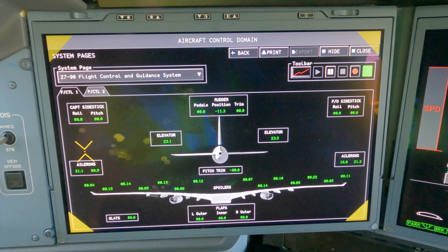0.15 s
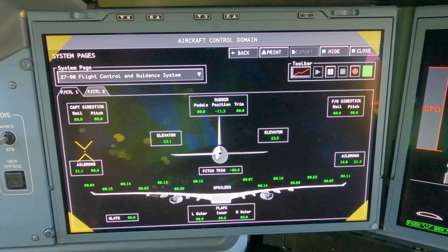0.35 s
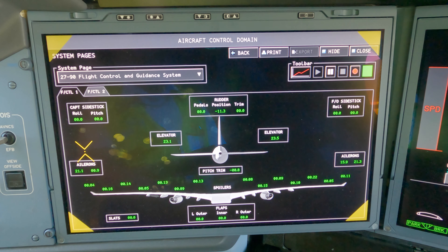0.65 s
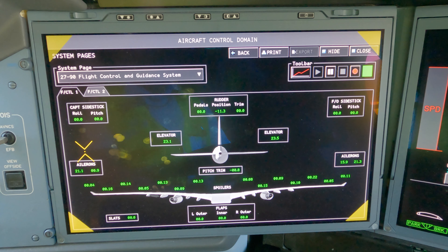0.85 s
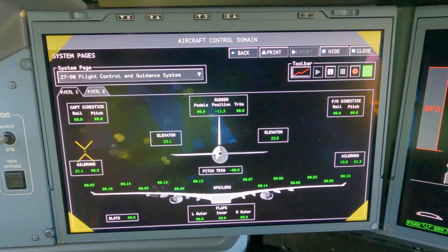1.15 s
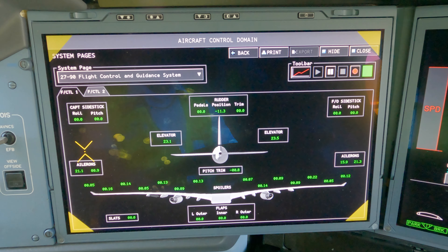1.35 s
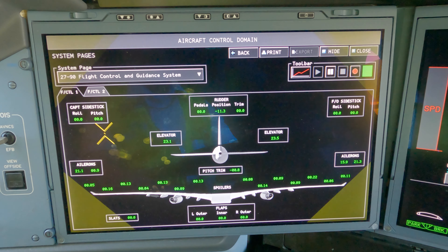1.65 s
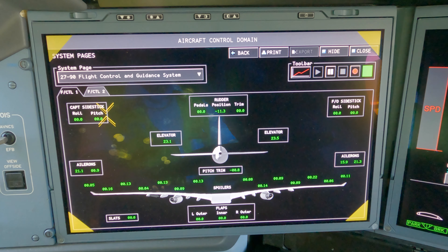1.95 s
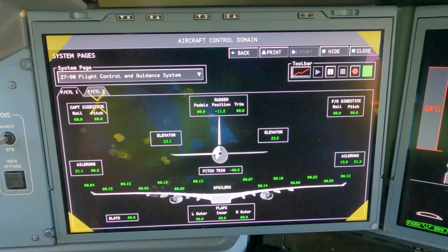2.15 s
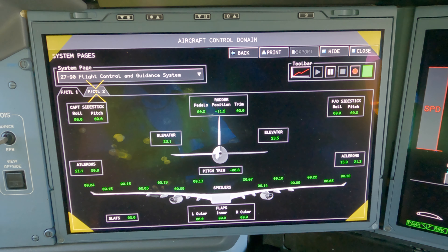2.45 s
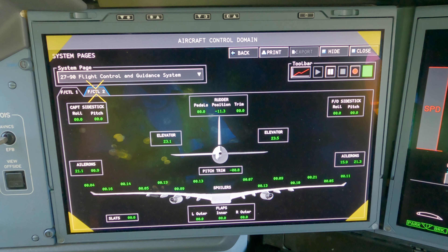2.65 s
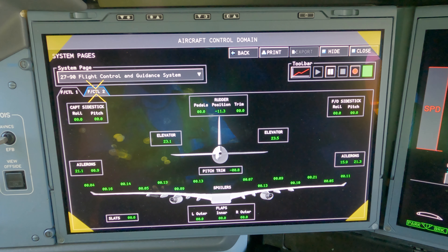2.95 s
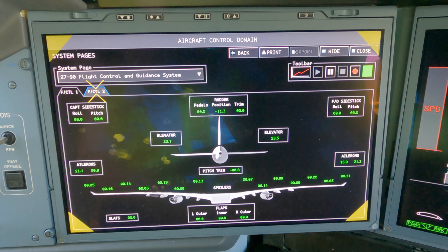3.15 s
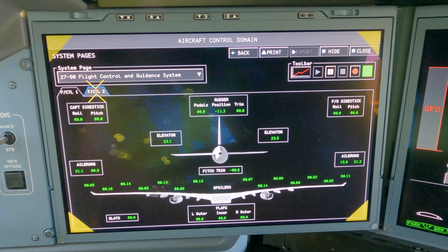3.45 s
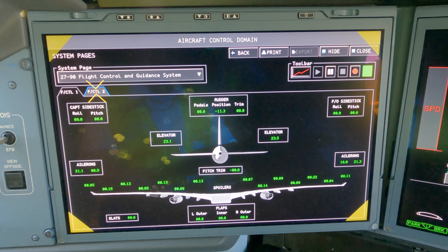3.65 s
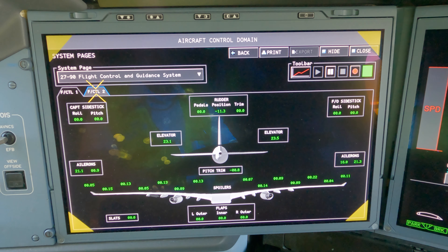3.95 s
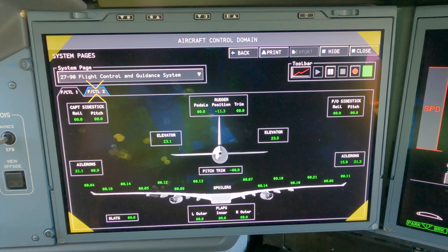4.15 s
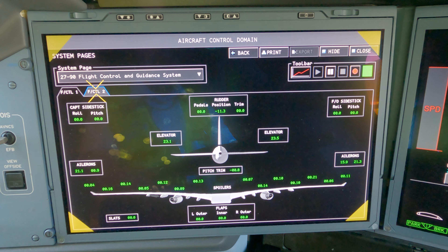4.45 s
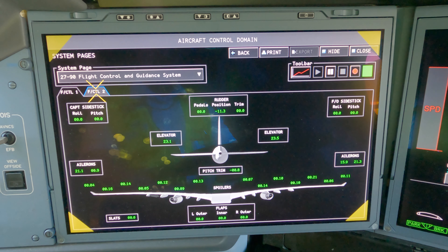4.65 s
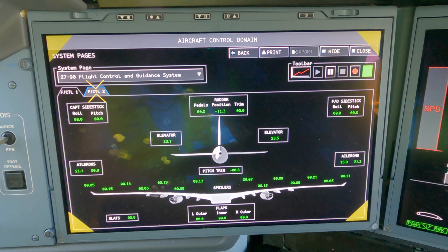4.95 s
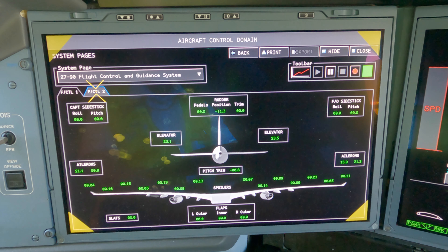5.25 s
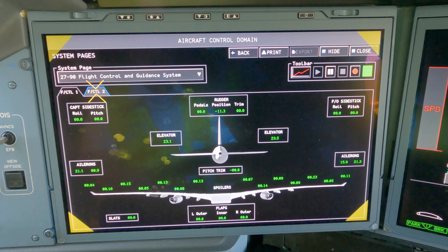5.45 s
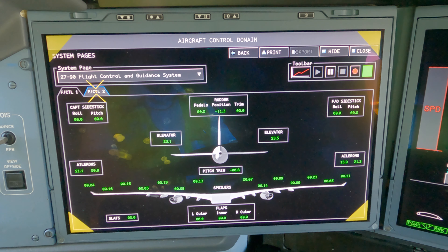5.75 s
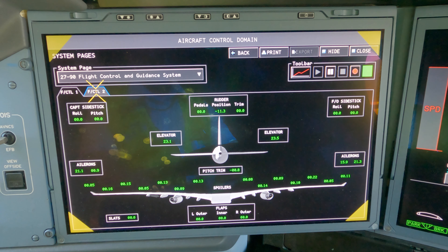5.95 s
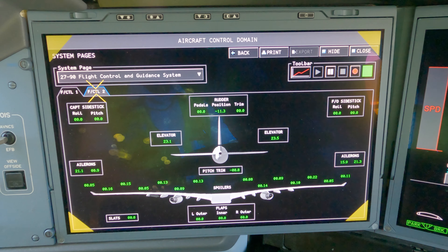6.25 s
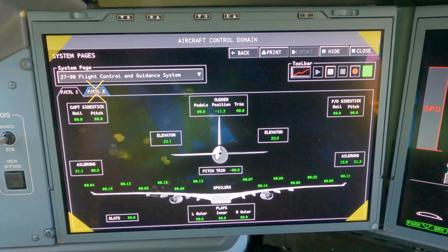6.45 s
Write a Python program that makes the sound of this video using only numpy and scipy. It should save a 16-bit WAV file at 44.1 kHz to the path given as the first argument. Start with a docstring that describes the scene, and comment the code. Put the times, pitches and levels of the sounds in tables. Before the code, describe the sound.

Cooling air rushes steadily through an aircraft cockpit, heard in stereo from inside, with a low airframe rumble and humming, thinly whining fans. One faint plastic tick opens it. Later there is a soft, brief cloth rustle, and the high whines give way to a slightly higher one. A mid-pitched fan tone swells briefly near the end while the drone carries on.

```python
"""A flight deck on the ground, heard through a two-port microphone. Cooling air rushes from the vents
and echoes off a near panel; cabin reflections cut narrow hollows in it. The airframe rumbles, fans and
ducts hum and whine. A small plastic tick comes at the start, a brief rustle later. Near 4.2 s three
whines fade, a higher one comes up and the air brightens slightly."""
import sys
import numpy as np
from scipy import signal
from scipy.fft import rfft, irfft, next_fast_len
from scipy.io import wavfile
from scipy.ndimage import uniform_filter1d

SR = 44100
rng = np.random.default_rng(int(sys.argv[2]) if len(sys.argv) > 2 else 0)


def pcm_store(signal):
    """Save signal as 16-bit PCM."""
    levels = np.round(np.clip(np.atleast_2d(signal), -1, 1) * 32767)
    wavfile.write(sys.argv[1], SR, levels.astype(np.int16).T)


N = 291501
N_FFT = next_fast_len(N)
TIME_S = np.arange(N) / SR
HZ = np.maximum(np.fft.rfftfreq(N_FFT, 1 / SR), 1)


def undb(db):
    """Decibels to gain."""
    return 10 ** (np.asarray(db) / 20)


def along(table, column=1):
    """Table column interpolated over log frequency."""
    rows = np.array(table, float)
    return np.interp(np.log(HZ), np.log(rows[:, 0]), rows[:, column])


def white():
    """Noise spectrum, unit power per Hz."""
    return rfft(rng.standard_normal(N_FFT)) * np.sqrt(SR / 2)


def wave(spectra):
    """Spectrum to sound."""
    return irfft(spectra, N_FFT)[..., :N]


def delay(ms):
    """Response of a pure delay."""
    return np.exp(-2j * np.pi * HZ * ms / 1000)


def walk(rate_hz):
    """Random steps, smoothed twice; unit deviation."""
    hold = int(SR / rate_hz)
    steps = np.repeat(rng.standard_normal(N // hold + 1), hold)
    smooth = uniform_filter1d(uniform_filter1d(steps, hold), hold)[:N]
    return smooth / smooth.std()


def pan(pan_db):
    """Port gains; pan is left minus right."""
    return undb(np.array([pan_db, -pan_db]) / 2)


def shift(centre_s=4.17, length_s=.6):
    """Smooth 0-to-1 step for the whines and the air's treble."""
    return .5 + .5 * np.tanh(2 * (TIME_S - centre_s) / length_s)


def flutter(spectra, edges_hz, rate_hz, depth_db):
    """Spectrum to sound, each band wavering alone."""
    bands = (wave(spectra * ((HZ >= lo) & (HZ < hi))) for lo, hi in zip(edges_hz, edges_hz[1:]))
    return sum(band * undb(depth_db * walk(rate_hz)) for band in bands)


def tone(hz, width_hz, db, pan_db, clean, waver_db=.8):
    """Wandering sine (power share `clean`) plus air ringing in a narrow resonance."""
    pitch_hz = hz + width_hz / 4 * walk(rate_hz=15)
    sine = np.sqrt(2) * np.sin(2 * np.pi * np.cumsum(pitch_hz) / SR)
    ring = wave(white() / (1 + (2 * (HZ - hz) / width_hz) ** 2))
    blend = np.sqrt(clean) * sine + np.sqrt(1 - clean) * ring / ring.std()
    return np.outer(pan(pan_db), undb(db + waver_db * walk(rate_hz=8)) * blend)


# Airframe spectrum: f/Hz, density/dB
RUMBLE = [(8, -86.5), (15, -55), (22, -40), (35, -47.5), (55, -45), (80, -51), (100, -57.5), (110, -62.5),
          (122, -74), (135, -81.5), (200, -110)]

def airframe_rumble():
    """Deep noise, alike at both ports."""
    return wave(white() * undb(along(RUMBLE)) * (HZ < RUMBLE[-1][0]))


# Tick onset: t/s, gain/dB
TICKS = [(.0942, -65)]
# Plastic modes: f/Hz, level/dB
TICK_MODES = [(6800, -2), (8900, -7), (10200, 2), (11300, -7), (12200, -4)]

def plastic_tick(rise_s=.00058, t60_s=.012):
    """Small plastic part ringing for a few ms."""
    age_s = TIME_S[:int(.04 * SR)]
    modes = sum(undb(db) * np.sin(2 * np.pi * hz * age_s) for hz, db in TICK_MODES)
    envelope = np.minimum(age_s / rise_s, 1) * np.exp(-np.log(1000) * age_s / t60_s)
    out = np.zeros(N)
    for start_s, db in TICKS:
        at = int(start_s * SR)
        out[at:at + len(age_s)] += undb(db) * modes * envelope
    return out


# Rustle swells: t/s, length/s, level/dB
RUSTLES = [(4.18, .085, -67.5), (4.34, .07, -75), (4.2, .5, -78), (3.45, 2.1, -76)]
# Rustle spectrum: f/Hz, relative density/dB
RUSTLE_SPECTRUM = [(2500, -8), (5000, 0), (7500, 0), (10000, -11), (12700, -15), (13200, -21), (15000, -22),
                   (15500, -45)]

def rustle(shared_gain=1.2):
    """Cloth near the microphone: overlapping swells of bright noise."""
    ports = shared_gain * white() + np.array([white(), white()])
    cloth = wave(ports * undb(along(RUSTLE_SPECTRUM)) * (HZ > 1500))
    swell = np.zeros(N)
    for start_s, length_s, db in RUSTLES:
        progress = np.clip((TIME_S - start_s) / length_s, 0, 1)
        swell += undb(db) * np.sqrt(np.sin(np.pi * progress).clip(0))
    return swell * cloth / cloth.std()


# Fan and duct pitches: f/Hz
TONE_HZ = (93.2, 243, 269, 297, 594, 759, 789, 799.5, 900, 982, 1108, 1303, 1599, 2122, 3731, 4781, 6385,
           3122, 3462, 3895, 4220, 5062, 5519, 6072)
# Per pitch: width/Hz, level/dB, pan/dB, clean share
TONES = [(2.9, -34, 0.75, 1), (19.74, -57.5, -1.5, 0), (25.7, -55.5, -2, 0.18), (35.87, -55.5, -0.5, 0.05),
         (14.96, -57, 8.5, 0.32), (26.3, -55, -1, 0.05), (14.2, -59, -1, 0.15), (2.12, -59.5, 0, 1),
         (40, -67.5, -1.5, .05), (29.5, -63, 5, 0.2), (28.7, -69, -3.5, 0), (24.8, -65, -11.5, 0.3),
         (30.4, -71.5, 2.5, 0.2), (24.4, -70, 2.5, .1), (50.1, -70.5, -6, .05), (14, -78.5, -2, 0.04),
         (60, -84, -3.5, .05), (30.3, -75, -2, .1), (35, -75, 0.5, .05), (30, -77.5, -4.5, .1),
         (30, -77.5, 0, .05), (30, -83, 1, 0.2), (40, -83, 0, .05), (30, -85, 1, .05)]
# Whine pitches: f/Hz
WHINE_HZ = (2590, 2637, 2685, 2925)
# Per whine: width/Hz, level before shift/dB, level after/dB, pan/dB, clean share
WHINES = [(29.5, -65, -77.5, 2, .1), (26, -66.5, -75, 0, .1), (50.2, -66.5, -75.5, 0, .05),
          (39.9, -86.5, -68.5, -7, 0.1)]
# Surges: t/s, fading whines' gain/dB, electrical hum line's gain/dB
SURGES = [(0, -4.5, 5.5), (.6, -2, -1), (1.1, 2, 0.5), (1.4, -5.5, -1.5), (2.2, -1, 0.5), (2.55, 2, -1),
          (3.6, -2.5, 1.5), (4, 3, -1), (4.6, 1, 1), (5.2, 6, 0), (5.5, 3, 10.5), (6.1, 6, 1.5),
          (6.6, 5, -4)]

def fans_and_ducts(hum_hz=799.5, whistle_s=4.9, whistle_half_width_s=.042):
    """Hums, a surging electrical hum line, one brief whistle, and whines that trade places at the shift."""
    times_s, *gains_db = np.array(SURGES).T
    whine_db, hum_db = (np.interp(TIME_S, times_s, db) for db in gains_db)
    hums = sum(tone(hz, *row) * undb(hum_db * (hz == hum_hz)) for hz, row in zip(TONE_HZ, TONES))
    whistle = tone(hz=4781, width_hz=5.6, db=-68, pan_db=-7, clean=.7)
    whistle *= np.exp(-((TIME_S - whistle_s) / whistle_half_width_s) ** 2)
    whines = 0
    for hz, (width_hz, before_db, after_db, pan_db, clean) in zip(WHINE_HZ, WHINES):
        db = before_db + (after_db - before_db) * shift() + whine_db * (before_db > after_db)
        whines += tone(hz, width_hz, db, pan_db, clean)
    return hums + whistle + whines


# Hiss spectrum: f/Hz, density/dB, pan/dB
HISS = [(4900, -125, -8.5), (6800, -114.5, -2), (8200, -115, -9.5), (8240, -119, -2.5), (11000, -126, -7),
        (13500, -130, 2.5), (14900, -131, 3), (15200, -142, -7.5), (16400, -142, -4)]

def high_hiss():
    """Thin, flickering hiss high in the treble, partly shared by the ports."""
    shared = .55 * white()
    ports = np.array([shared + white(), shared + white()]) * (HZ > HISS[0][0])
    spectra = ports * undb(along(HISS)) * pan(along(HISS, column=2))
    return flutter(spectra, (0, 8400, 10500, 12800, SR), rate_hz=25, depth_db=.8)


# Vent air before its echo: f/Hz, density/dB
AIR_MID = [(60, -77.5), (150, -66), (270, -70), (420, -79), (600, -78.5), (680, -84.5), (790, -80),
           (900, -84.5), (1300, -88.5), (2300, -93), (3300, -96), (4300, -99), (6400, -106), (8000, -120)]
# Air in antiphase at the ports: f/Hz, density/dB, panel echo share
AIR_SIDE = [(15, -86.5, .1), (90, -79.5, .1), (140, -97, 0), (450, -96, .2), (600, -94, .2),
            (700, -100, 0.2), (1300, -100, .4), (2000, -99, .4), (3300, -103, .3), (4400, -108, .1),
            (5300, -113, .1), (7000, -118, 0.02), (8200, -124, .1)]
# Cancellations by cabin reflections: f/Hz, width/Hz, depth 0-1
HOLLOWS = [(225, 14.5, 0.65), (181, 28, 0.35), (339, 50, 0.41), (638, 23, 0.3), (852, 40, 0.35),
           (1070, 52, 0.25)]

def vent_rush(panel_ms=3.77, panel_gain=.5, second_gain=.043, port_ms=.573, port_gain=.61):
    """Vent noise combed by its panel echo, more deeply at the right port."""
    stream = white()
    notches = [1 - depth / (1 + (2 * (HZ - hz) / width_hz) ** 2) for hz, width_hz, depth in HOLLOWS]
    panel_comb = 1 + panel_gain * delay(panel_ms) - second_gain * delay(2 * panel_ms)
    mid = stream * undb(along(AIR_MID)) * np.prod(notches, axis=0) * panel_comb
    echo_share = along(AIR_SIDE, column=2)
    side = np.sqrt(1 - echo_share) * white() - np.sqrt(echo_share) * stream * delay(panel_ms)
    port_comb = 1 + port_gain * delay(port_ms)  # echo round the microphone body
    side *= undb(along(AIR_SIDE)) * port_comb
    spectra = np.array([mid + side, mid - side]) * (HZ < AIR_MID[-1][0] * 1.03)
    return flutter(spectra, (0, 1400, 2800, 5600, SR), rate_hz=16, depth_db=.46)


# Air flow: t/s, gain/dB
FLOW = [(0, 3.5), (.7, 3.5), (1.5, 3), (2.5, 3.5), (3.3, 3.5), (4.2, 4.5), (4.7, 2), (5.5, 3.5), (6.6, 2.5)]

def cooling_air(swell_db=.15, lift_db=1.5, lift_above_hz=3500):
    """Rush and hiss swell with the flow; the treble lifts at the shift."""
    flow_db = np.interp(TIME_S, *np.array(FLOW).T) + swell_db * walk(rate_hz=2.4)
    stream = undb(flow_db) * (vent_rush() + high_hiss())
    treble = signal.sosfilt(signal.butter(1, lift_above_hz, "high", fs=SR, output="sos"), stream)
    return stream + (undb(lift_db * shift()) - 1) * treble


def scene():
    """All sources on the deck, in stereo."""
    return cooling_air() + airframe_rumble() + fans_and_ducts() + plastic_tick() + rustle()


def record(dry):
    """Steep low-pass at 16350 Hz."""
    return signal.sosfiltfilt(signal.ellip(6, .1, 40, 16350, fs=SR, output="sos"), dry)


dry = scene()
out = record(dry)
pcm_store(out)
```